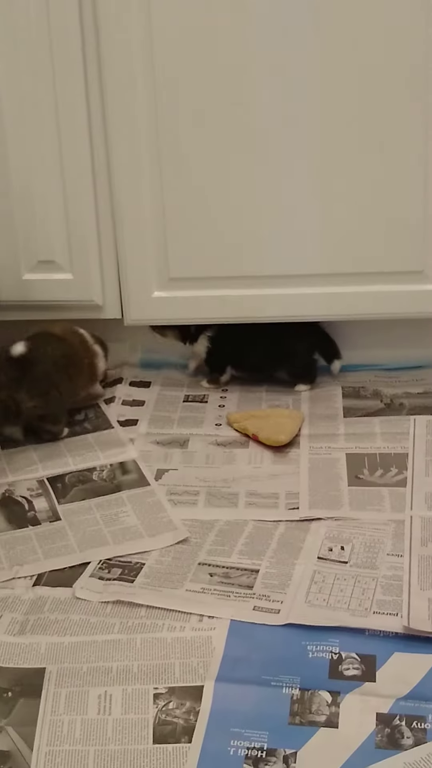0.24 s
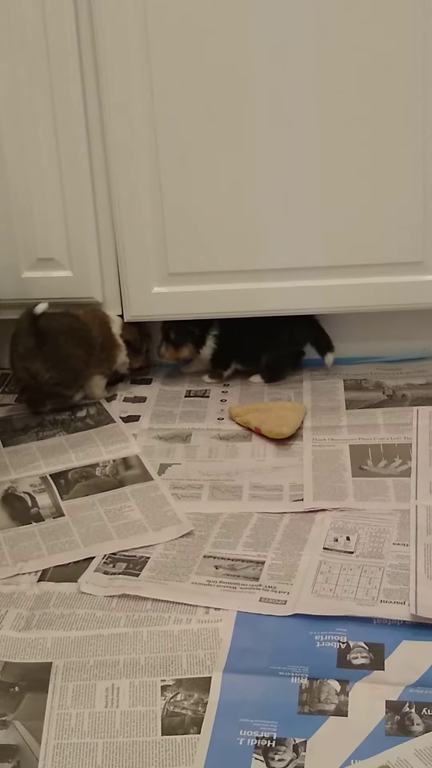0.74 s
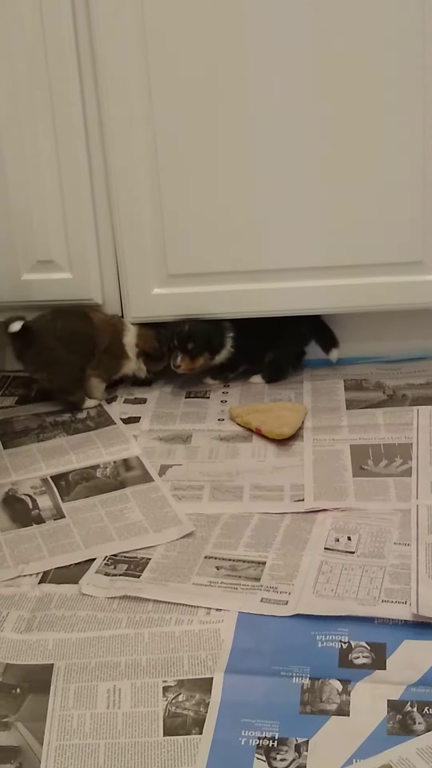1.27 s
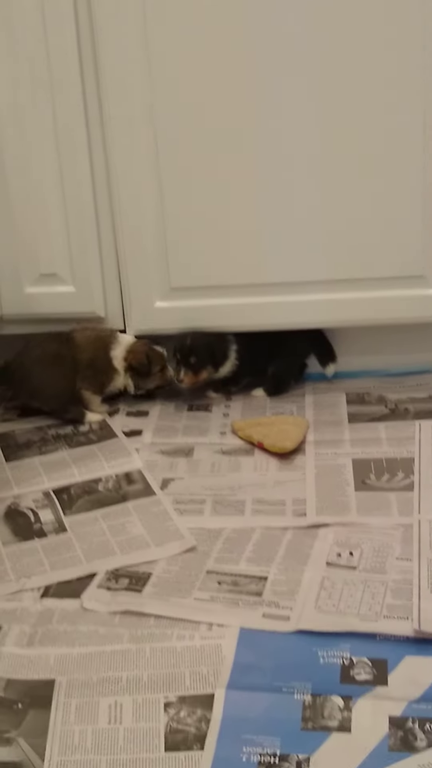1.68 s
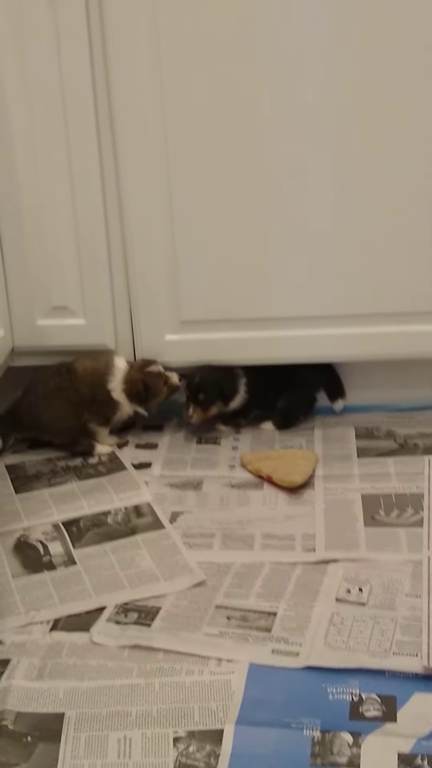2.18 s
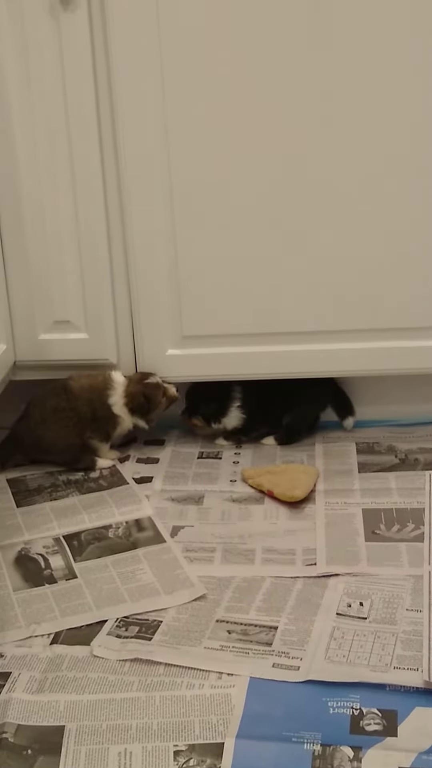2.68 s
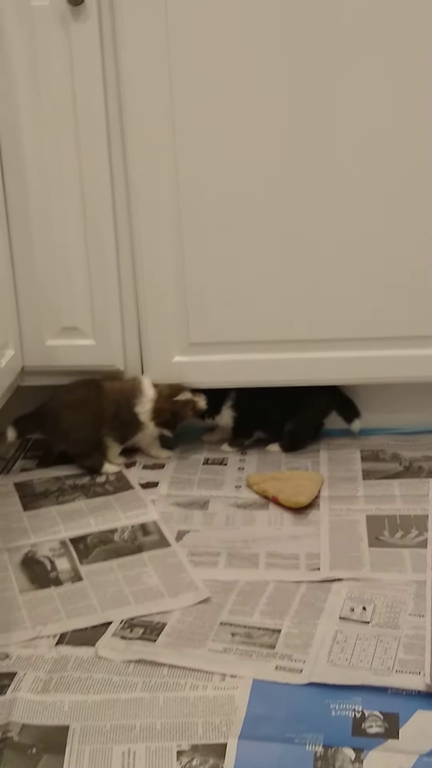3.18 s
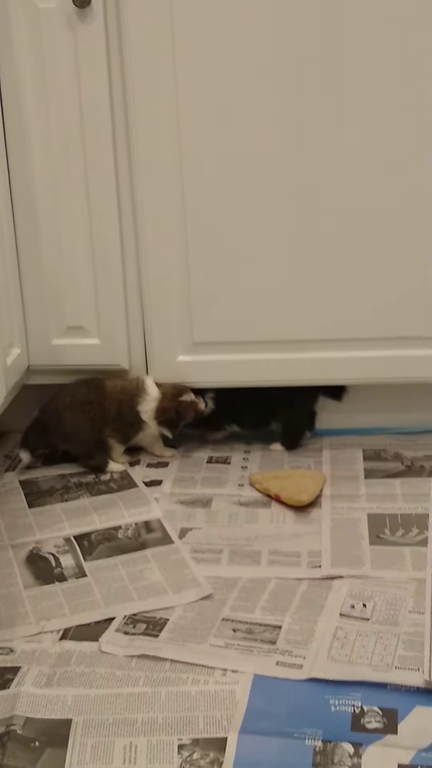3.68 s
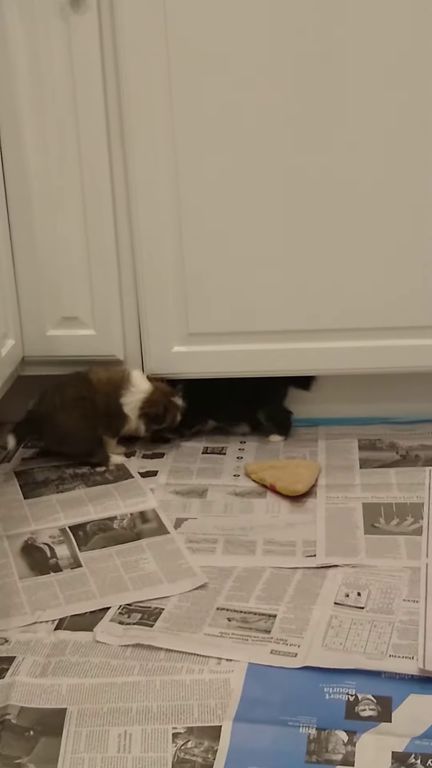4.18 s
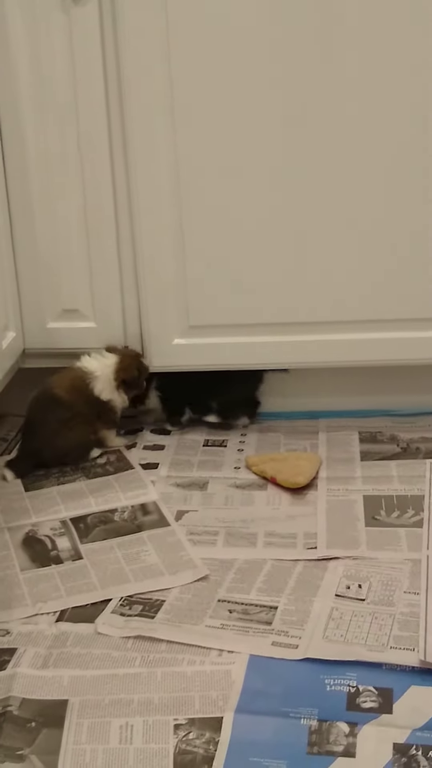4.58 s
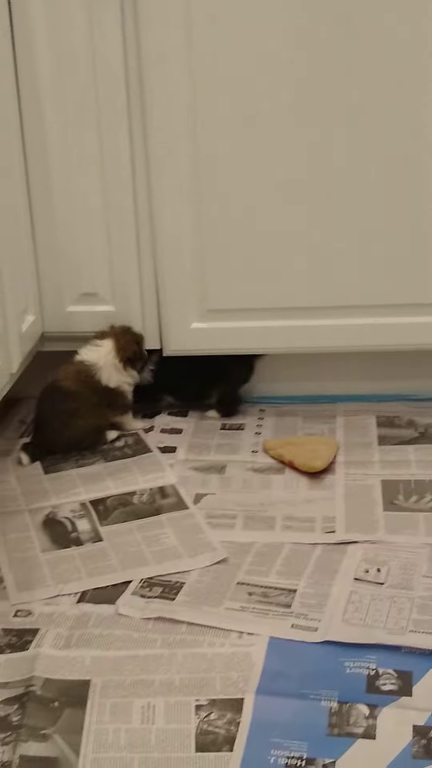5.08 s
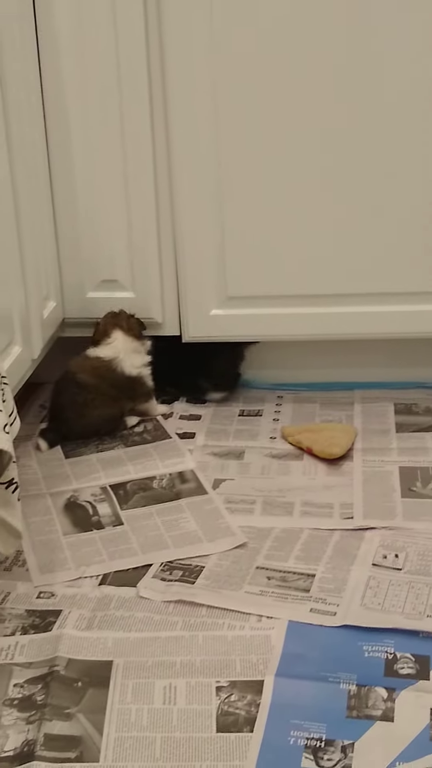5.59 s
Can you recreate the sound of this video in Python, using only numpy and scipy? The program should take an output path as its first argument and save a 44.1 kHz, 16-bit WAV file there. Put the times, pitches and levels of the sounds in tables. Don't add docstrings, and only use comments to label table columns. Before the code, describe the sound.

Small puppies scuffle on newspaper spread over a kitchen floor, the sheets rustling, crackling and snapping with soft paw thuds beneath.

```python
import sys
import numpy as np
from scipy import signal
from scipy.fft import rfft, irfft, next_fast_len
from scipy.io import wavfile
from scipy.ndimage import uniform_filter1d

SR = 44100
rng = np.random.default_rng(int(sys.argv[2]) if len(sys.argv) > 2 else 0)


def volts_from_decibels(level):
    exponent = np.asarray(level, float) / 20
    return 10 ** exponent


def persist_wave(psi):
    counts = np.round(np.clip(psi, -1, 1) * 32767).astype(np.int16)
    wavfile.write(sys.argv[1], SR, np.atleast_2d(counts).T)


N = 257984

# (frequency [Hz], level [dB per Hz])
HUSH_SPECTRUM = [(20, -46), (40, -10), (80, -11), (157, -9), (223, -1.5), (317, -5.5), (660, -11),
                 (1600, -26), (4400, -23.5), (8400, -26.5), (12900, -25), (16500, -23.5)]
# (frequency [Hz], level [dB rms])
WHINE_TONES = [(12839, -91), (14040, -101)]
# (frequency [Hz], coherence [0-1])
PORT_LIKENESS = [(60, 1), (150, 0.9), (300, 0.92), (600, 0.52), (1500, 0.22), (5000, 0.078), (15000, 0.047)]
# (frequency [Hz], left minus right [dB])
PORT_TILT = [(60, -0.5), (300, 1.5), (2000, 0), (5000, -.5), (8000, 1), (10800, -9.5), (13000, -1.5),
             (16000, -6)]
# (time [s], peak [dB], boom [dB], knock [dB], ring [Hz])
BUMPS = [(.089, -35.5, -10.5, 2.5, 326), (.11, -38, -14.5, 3, 128), (0.75, -55, -19, 3.5, 400),
         (0.84, -46.5, -14, 5.5, 240), (.83, -54, -10, 0, 132), (1.19, -59.5, -6.5, -7.5, 181),
         (1.394, -53, -33, 3.5, 260), (2.0284, -58, -2, 3, 269), (3.124, -40.5, -26, 4.5, 370),
         (3.1995, -44.5, -21, 2, 380), (4.6004, -47.5, -4, 1, 650), (.16, -42.5, -8, 2, 253),
         (3.2256, -45.5, -8, -3.5, 103), (3.309, -48.5, -12, -1, 93), (3.358, -50, -9, -6, 390),
         (3.474, -28, -11, -3, 116), (3.515, -38, -10.5, -10, 54), (3.6, -46, -12, -10, 60),
         (4.545, -43, -10, -3, 380), (3.719, -59.5, -18, 7, 85.5), (4.03, -57.5, 0.5, 12.5, 87),
         (4.53, -38, -3.5, -1.5, 520), (4.888, -50.5, 1.5, -12, 91), (5.082, -52, -9.5, -2, 156),
         (5.721, -45, -4.5, -9.5, 255), (5.745, -46, -4, -4.5, 220), (3.512, -37.5, -14, -5.5, 135),
         (3.575, -43, -7.5, -9, 124), (3.479, -37.5, -17, -2, 450), (3.13, -45, -20, -8, 242),
         (3.255, -49.5, -20, -6, 180), (1.164, -58, -16, -11, 240), (0.89, -54, -24, -3, 400),
         (4.92, -54, -8, -8, 150)]
# (frequency [Hz], width [Hz], level [dB])
BOARD_MODES = [(55, 17, -9), (84, 14, 5.5), (191, 26, -8), (244, 77, -6.5), (388, 41, -4), (643, 10, 0.5)]
# (time [s], weight [dB])
BEARING = [(0, 5), (.3, 0.5), (.9, -1), (1.4, -1), (2.0, -5), (2.4, -9), (2.7, -2), (3.1, -3.5),
           (3.4, -0.5), (3.8, 0), (4.2, 2.5), (4.6, -7), (4.8, -2), (5.1, -4.5), (5.4, -2), (5.85, -5.5)]
# (frequency [Hz], level [dB per Hz])
DRAG_SPECTRUM = [(150, -10), (300, -5), (600, 4), (1200, -1.5), (2500, -33.5)]
# (frequency [Hz], level [dB per Hz])
TREAD_SPECTRUM = [(25, -27), (50, -20), (90, 3), (150, -5), (230, 2.5), (330, -7), (600, -30)]
# (time [s], peak [dB], pitch [Hz])
KINK_EVENTS = [(2.2294, -44, 10300), (2.2544, -47, 3000), (2.432, -49, 7000), (3.0155, -49, 8000),
               (3.738, -35, 4720), (3.7994, -33, 9230), (4.038, -33, 4000), (4.17, -37, 6240),
               (4.2215, -40, 8000), (4.313, -33, 9700), (4.8396, -42, 3500), (4.8544, -38, 3000),
               (4.8674, -41, 6000), (4.9414, -37, 2980), (4.9844, -46, 3440), (5.0165, -45.5, 2500),
               (5.1994, -34, 11400), (5.2244, -28, 2900), (5.2533, -41, 10500), (5.3244, -39, 2430),
               (5.374, -38, 1150), (5.3994, -36, 3250), (5.4396, -35, 4760), (5.495, -34, 5120),
               (5.609, -38.5, 2700), (5.6194, -39, 11000), (5.6705, -47, 3130), (5.7555, -34, 6550),
               (.096, -31, 2450), (.12, -40, 1700), (.86, -52, 1400)]
# (time [s], peak [dB], pitch [Hz], tail [dB])
FOLD_POPS = [(.0895, -30.5, 1850, 3), (.7512, -54.5, 1300, -2), (.814, -54, 1670, 4.5),
             (.8455, -50, 1620, 4.5), (1.2353, -70, 2140, -5), (1.269, -47, 1870, 3),
             (1.418, -42.5, 2680, 0), (1.4513, -40, 2710, -1.5), (1.8012, -41, 2860, -18),
             (2.5737, -40.5, 2130, 1), (2.6474, -22.5, 3550, -5.5), (2.862, -36, 1951, -20),
             (3.1207, -36.5, 2348, 0), (3.23, -37, 2980, 3), (3.365, -27.5, 2710, -8.5),
             (4.247, -27, 2500, -6.5), (4.531, -39.5, 1560, -5), (4.5387, -38, 2030, 0.5),
             (4.7227, -41.5, 3370, 1), (5.0935, -40.5, 3220, 1.5), (5.2877, -35.5, 3030, -19),
             (5.3009, -26.5, 2410, -12), (5.3595, -24, 3100, -11), (5.367, -24.5, 3140, -8),
             (5.178, -47, 1280, 9), (5.7519, -35.5, 2560, 1), (5.8286, -39.5, 2360, -3)]
# (time [s], peak [dB], pitch [Hz], tail [dB])
CREASE_SNAPS = [(.2885, -45, 4380, -11), (1.195, -50, 3900, -7), (1.485, -41, 4460, -5),
                (1.513, -37.5, 5300, -6.5), (1.622, -56.5, 4680, 6), (1.7088, -40.5, 4080, -7.5),
                (1.7649, -46.5, 4430, -14), (2.16, -42, 3700, -28.5), (2.565, -42, 7500, -14),
                (1.8133, -35.5, 5600, -4), (2.0348, -28.5, 7030, -12), (2.0564, -38, 3870, 2),
                (2.1687, -25.5, 4280, -9), (2.377, -37, 5700, -13), (2.3946, -39.5, 5170, -5.5),
                (2.7254, -38.5, 5460, 0.5), (2.714, -36, 4500, -15), (2.826, -43, 3600, -7),
                (2.9087, -59.5, 3600, -12), (3.252, -24.5, 4000, -7), (3.732, -37.5, 3970, 5.5),
                (3.7452, -26, 4660, -9), (3.7483, -27, 4200, -17), (3.8392, -33.5, 4630, -21.5),
                (3.9028, -34.5, 4700, -4.5), (3.9785, -33, 4460, -2.5), (4.0212, -37, 3790, 1),
                (5.5827, -25.5, 5130, -7), (5.685, -43, 4370, -3)]
# (time [s], peak [dB], pitch [Hz], tail [dB])
EDGE_TICKS = [(.3651, -60, 10330, 4.5), (.4656, -51.5, 9000, -3.5), (1.536, -45, 11100, 0.5),
              (1.6671, -45.5, 10000, -1.5), (1.876, -36, 7650, -7), (1.9804, -31, 9500, -6),
              (2.6055, -35, 9600, -5.5), (2.7254, -27.5, 10340, -16.5), (2.7674, -40.5, 8300, -14),
              (2.7966, -40, 8480, 2), (2.807, -33, 8500, -4), (3.028, -47.5, 11200, 4.5),
              (3.4075, -34.5, 10300, -9), (3.4745, -28, 9360, 0.5), (3.492, -28.5, 9800, -4.5),
              (3.6556, -23, 10400, -6), (4.05, -20.5, 9800, -8), (4.0903, -31.5, 11100, 2),
              (4.2998, -36, 9700, -8), (4.4787, -42.5, 9800, -2.5), (4.672, -38, 10500, -5),
              (4.7647, -33.5, 10270, 0.5), (5.044, -48, 10100, 8), (5.5274, -19.5, 9900, -5.5)]
# (time [s], level [dB], rise [s per 20 dB], fall [s per 20 dB])
PAW_PRESSES = [(0, -71.5, .05, 0.95), (.11, -44, 0.03, 0.1842), (.87, -56, 0.02, 0.11),
               (1.34, -59, 0.32, -0.03), (1.43, -60.5, 0.24, 0.6), (1.82, -73, 0, 0),
               (2.0, -53.5, -0.05, .5), (2.17, -52, .5, 0.11), (2.4, -62, -0.6, 0.5),
               (2.575, -56, -0.05, 0.74), (2.66, -57, -0.18, 0.5), (2.83, -49.5, -0.32, 0.11),
               (3.13, -50.5, -0.25, 0.3), (3.26, -49.5, -0.14, 0.2), (3.37, -44, -0.16, 0.24),
               (3.49, -45, -0.14, 0.32), (3.66, -57, 0.5, 2), (3.75, -43.5, -0.12, 0.17),
               (3.84, -68, -0.1, 2), (3.915, -58, -0.5, 0), (2.27, -57.5, .05, -0.04),
               (4.06, -49.5, -0.08, 0.08), (4.15, -47, -0.02, 0.18), (4.25, -38, -0.0648, -0.0744),
               (4.33, -46.5, 0.22, 0.13), (4.56, -47, 0.02, 0.34), (4.77, -43.5, 0.12, .12),
               (4.94, -57, .5, 0.2), (5.23, -38.5, 0.0942, 0.2), (5.37, -43, 0.04, 0.32),
               (5.54, -42.5, 0.03, 0.15), (5.755, -34, -0.02, -0.05), (4.99, -55.5, .06, .12),
               (4.87, -61, -0.5, 0.4), (5.45, -48, 0, 0.07), (5.69, -55, -1.8, 0.5), (3.8, -59, .03, 0.3),
               (4.04, -49, -0.1, .05), (5.1, -49, 0.02, -0.5), (5.31, -46, 0, 0)]
# (time [s], level [dB], rise [s per 20 dB], fall [s per 20 dB])
PAW_SLIDES = [(.03, -70, 2, 1.5), (.12, -42, -0.05, 0.1341), (.86, -72, 0.1, 6), (1.34, -53.5, 0.14, .06),
              (1.43, -66, 0.1, 1.5), (1.82, -54, -0.15, 0), (2.0, -51, -0.04, 0.26), (2.1, -51, 0.33, 0),
              (2.17, -39, -0.0346, -0.17), (2.285, -60, 0.2, 0), (2.57, -55, -0.5, 0),
              (2.66, -48.5, -0.29, 0.14), (2.75, -47, -0.13, 0.18), (3.05, -64, 0.1, 3.5),
              (3.26, -42, 0.02, -0.45), (3.37, -55, 0.5, 2.3), (3.5, -47.5, 0.07, 0.23),
              (3.64, -48, 0.13, -0.24), (3.76, -47.5, .09, 0.1), (3.92, -58, -0.2, 0),
              (4.06, -46, -0.37, 0.18), (4.15, -48, 0.1, 0.21), (4.315, -38.5, .07, 0.08),
              (4.355, -44, 0.03, 0.05), (4.58, -51.5, -0.4, 0.7), (4.77, -52.5, 0.14, 0.5),
              (4.94, -49, 0, -0.03), (5.16, -40.5, 0.1, 0.05), (5.41, -43.5, 0, 0.1), (5.54, -56, 0, -0.3),
              (5.74, -60, .3, 0), (4.9, -52, -0.1, 0.2), (5.21, -48, -0.12, .1), (5.255, -52, -0.2, 0.3),
              (5.45, -45, -0.2, 0), (3.81, -49, 0.14, 0), (2.43, -62, -0.4, 0.2), (4.485, -60, -1, -1.7),
              (5.07, -54, -0.5, 1.2), (5.83, -56, -1.7, .2)]
# (frequency [Hz], level [dB per Hz])
CRUMPLE_SPECTRUM = [(500, -31), (900, -2), (1600, -1), (3000, 2.5), (6000, -5.5), (10000, -6.5),
                    (14500, -12.5), (16500, -24)]
# (frequency [Hz], level [dB per Hz])
SCUFF_SPECTRUM = [(2300, -16.5), (4000, -1.5), (7500, 0), (11000, 4.5), (13000, 0), (15000, -2),
                  (16500, -34)]
IN_COMMON = np.array([[1], [0]])


def along(points, hz):
    f, v = np.transpose(points)
    return np.interp(np.log(hz + 1), np.log(f + 1), v)


def unit(x):
    return x / np.sqrt(np.mean(x ** 2) + 1e-20)


def filtered(x, response):
    m = next_fast_len(x.shape[-1] + 4096)
    return irfft(rfft(x, m) * response(np.fft.rfftfreq(m, 1 / SR)), m)[..., :x.shape[-1]]


def hump(hz, centre_hz, octaves):
    return np.exp(-0.5 * (np.log2((hz + 1) / centre_hz) / octaves) ** 2)


def ports(pair, lag=0.000439):
    def turn(hz):
        return np.arccos(np.clip(along(PORT_LIKENESS, hz), 0, 1)) / 2

    def tilt(hz):
        return volts_from_decibels(along(PORT_TILT, hz) / 2) * np.exp(-1j * np.pi * hz * lag)

    mid, side = filtered(pair, lambda hz: np.array([np.cos(turn(hz)), np.sin(turn(hz))]))
    left_right = np.array([mid + side, mid - side])
    return filtered(left_right, lambda hz: np.array([tilt(hz), 1 / tilt(hz)]))


def patches(depth_db):
    z = signal.stft(rng.standard_normal((2, N)), nperseg=256)[2]
    field = uniform_filter1d(rng.standard_normal(z.shape[1:]), size=8, axis=0)
    field = uniform_filter1d(field, size=8, axis=1)
    return signal.istft(z * volts_from_decibels(depth_db * unit(field)), nperseg=256)[1][:, :N]


def layer(shape, grain, depth_db):
    return unit(filtered(grain * patches(depth_db), lambda hz: volts_from_decibels(along(shape, hz))))


def strokes(rows):
    s, db, rise, fall = np.transpose(rows)[:, :, None]
    t = np.arange(0, N + 64, 64) / SR
    away = np.where(t < s, (s - t) / np.maximum(rise, 0.004), (t - s) / np.maximum(fall, 0.004))
    stroke_db = db - 20 * away ** 1.144
    power = np.sum(volts_from_decibels(2 * stroke_db), axis=0)
    return np.interp(np.arange(N) / SR, t, 10 * np.log10(power + 1e-12))


def add_at(out, s, sound):
    out[:, round(s * SR):][:, :sound.shape[1]] += sound


def hush():
    noise = layer(HUSH_SPECTRUM, 1, depth_db=0.45)
    whine = 0
    for hz, db in WHINE_TONES:
        peak = [(hz - 10, -60), (hz, 0), (hz + 10, -60)]
        whine = whine + volts_from_decibels(db) * layer(peak, 1, depth_db=0)
    return volts_from_decibels(-67.5) * ports(noise, lag=0) + whine


def bumps():
    out, t = np.zeros((2, N + SR)), np.arange(SR // 2) / SR

    def wood(f):
        modes = sum(volts_from_decibels(db) * f * w / (c * c - f * f + 1j * f * w) for c, w, db in BOARD_MODES)
        return 0.62 + np.abs(modes)

    def band(hz, octaves):
        noise = rng.standard_normal((2, len(t)))
        shaken = filtered(noise, lambda f: wood(f) * hump(f, hz, octaves))
        return shaken / np.sqrt(np.mean(shaken[:, :SR // 10] ** 2))

    for s, db, boom_db, knock_db, ring_hz in BUMPS:
        t60 = 0.39 * (ring_hz / 200) ** 0.16

        def swell(rise, slow):
            fall = (t / (slow * max(t60, 0.05))) ** 1.31
            return (1 - np.exp(-t / rise)) * volts_from_decibels(-60 * fall)

        ring = 1.68 * swell(0.004, 0.44) * np.sin(2 * np.pi * ring_hz * t) * IN_COMMON
        boom = volts_from_decibels(boom_db + 5.0) * swell(0.013, 0.92) * band(84, 1.0)
        knock = volts_from_decibels(knock_db + 1.5) * swell(0.0076, 0.74) * band(673, 0.93)
        rough = volts_from_decibels(-2.5) * band(ring_hz, 0.18)
        shake = 0.87 * swell(0.0048, 0.78) * (band(203, 0.71) + rough)
        add_at(out, s, volts_from_decibels(db - 5.5) * (ring + shake + boom + knock))
    return out[:, :N]


def underfoot():
    s, weight = np.transpose(BEARING)
    weight_db = np.interp(np.arange(N) / SR, s, weight)
    rustle_db = strokes(PAW_PRESSES) + 50
    slow_db = uniform_filter1d(rustle_db, size=SR // 12)
    drag = volts_from_decibels(-56.5 + 0.76 * rustle_db + weight_db) * layer(DRAG_SPECTRUM, 1, depth_db=2.5)
    tread = volts_from_decibels(-61.5 + 0.38 * slow_db + 0.32 * weight_db) * layer(TREAD_SPECTRUM, 1, depth_db=1.0)
    return drag, tread


def pings():
    count = round(120 * N / SR)
    draw, t = rng.random((count, 4)), np.arange(SR // 80) / SR
    hz = 3854 * 2 ** (1.255 * (draw[:, 1:2] + draw[:, 2:3] - 1))
    decay_db = -20 * t * hz / 15
    notes = volts_from_decibels(17 * draw[:, 3:] + decay_db) * np.sin(2 * np.pi * hz * t)
    at = (draw[:, :1] * N).astype(int) + np.arange(len(t))
    out = unit(np.bincount(at.ravel(), notes.ravel(), N + len(t))[:N])
    return volts_from_decibels(strokes(PAW_PRESSES) - 9.5) * np.array([out, np.roll(out, SR // 300)])


def kinks():
    out, t = np.zeros((2, N + SR)), np.arange(SR // 12) / SR
    for s, db, hz in KINK_EVENTS:
        noise = rng.standard_normal((2, len(t)))
        noise = unit(filtered(noise, lambda f: hump(f, hz, 0.27) + volts_from_decibels(-6) * hump(f, 6400, 0.66)))
        rustle = volts_from_decibels(-12 - 60 * t / 0.13)
        click = (1 - np.exp(-t / 0.00051)) * (volts_from_decibels(-60 * t / 0.0097) + rustle)
        note = 0.54 * volts_from_decibels(-60 * t / 0.041) * np.sin(2 * np.pi * hz * t)
        add_at(out, s, volts_from_decibels(db - 5.5) * (click * noise + note * IN_COMMON))
    return out[:, :N]


def snaps(rows, bright_db, broad_db):
    out, t = np.zeros((2, N + SR)), np.arange(SR // 5) / SR
    for s, db, hz, tail_db in rows:
        def colour(f):
            broad = hump(f, 3280, 0.99) + volts_from_decibels(-10.5) * hump(f, 1800, 1.0)
            bright = hump(f, 10200, 0.22) + 0.76 * hump(f, 6900, 0.56) + 0.36 * hump(f, 14000, 0.2)
            return volts_from_decibels(broad_db) * broad + 0.67 * hump(f, hz, 0.48) + volts_from_decibels(bright_db - 4.5) * bright

        noise = unit(filtered(rng.standard_normal((2, len(t))), colour))
        spike = volts_from_decibels(-6.5 - 60 * t / 0.0017)
        crack = (1 - np.exp(-t / 0.00056)) * (volts_from_decibels(-60 * (t / 0.011) ** 2) + spike)
        crack = crack + 0.14 * np.roll(crack, round(0.0018 * SR))
        ring = volts_from_decibels(-2 - 60 * t / 0.026) * np.sin(2 * np.pi * hz * t)
        t60 = 0.23 * volts_from_decibels(0.5 * tail_db)
        shiver = volts_from_decibels(tail_db - 60 * t / max(t60, 0.02)) * (1 - np.exp(-(t / 0.0081) ** 2))
        add_at(out, s, volts_from_decibels(db - 7) * ((crack + shiver) * noise + ring * IN_COMMON))
    return out[:, :N]


def creases():
    folds = snaps(FOLD_POPS, bright_db=-7, broad_db=-9)
    middling = snaps(CREASE_SNAPS, bright_db=-4, broad_db=-0.5)
    return folds + middling + snaps(EDGE_TICKS, bright_db=-6, broad_db=-1)


def crackle(rate, spread_db, t60):
    size_db = spread_db * np.minimum(rng.exponential(1, N), 3.5)
    ticks = (rng.random(N) < rate / SR) * volts_from_decibels(2 * size_db)
    power = signal.fftconvolve(ticks, volts_from_decibels(-120 * np.arange(SR // 5) / SR / t60))[:N]
    return unit(np.sqrt(np.abs(power)))


def sheets():
    ticks = crackle(rate=250, spread_db=3.0, t60=0.16)
    fine_ticks = crackle(rate=1500, spread_db=4.0, t60=0.021)
    crumple = layer(CRUMPLE_SPECTRUM, ticks + 0.26, depth_db=3.0)
    scuff = layer(SCUFF_SPECTRUM, ticks + 3.3 + 0.62 * fine_ticks, depth_db=2.5)
    return volts_from_decibels(strokes(PAW_PRESSES) - 1.5) * crumple + volts_from_decibels(strokes(PAW_SLIDES) + 1.0) * scuff


def scene():
    still = hush()
    drag, tread = underfoot()
    floor = bumps() + tread
    paper = drag + pings() + kinks() + creases() + sheets()
    return ports(paper) + ports(floor, lag=0.0001) + still


def band_limit(x):
    return signal.sosfilt(signal.butter(12, 16660, fs=SR, output="sos"), x)


def record(dry):
    def band(hz):
        top = np.where(hz < 15950, 1, volts_from_decibels(-39) * (hz < 16600))
        return top / np.sqrt(1 + (42.5 / (hz + 1)) ** 12)

    return band_limit(filtered(dry, band))


dry = scene()
out = record(dry)
persist_wave(out)
```